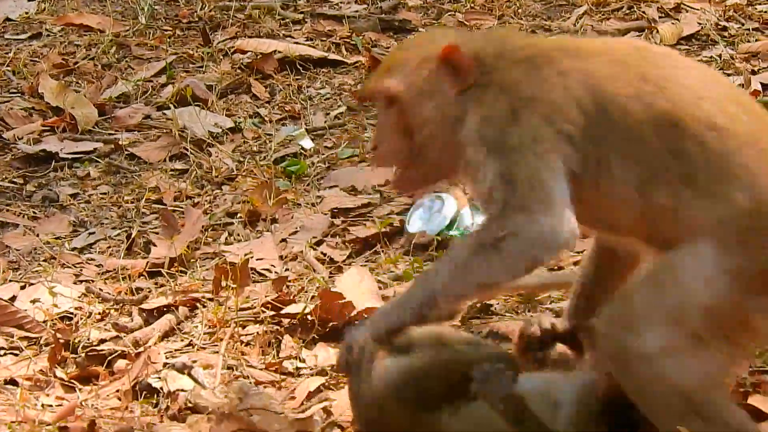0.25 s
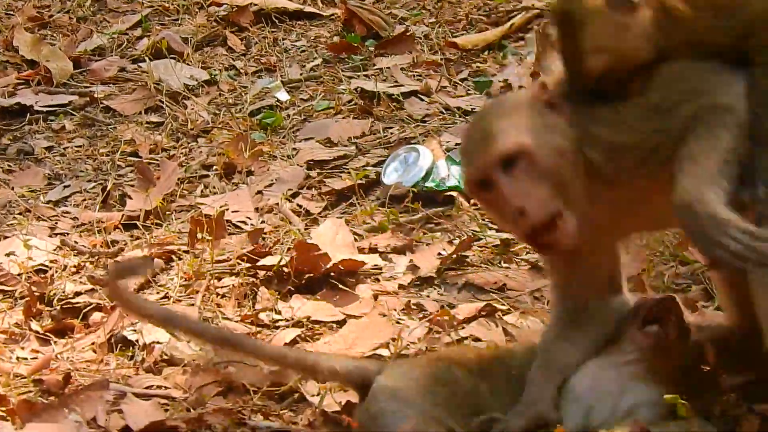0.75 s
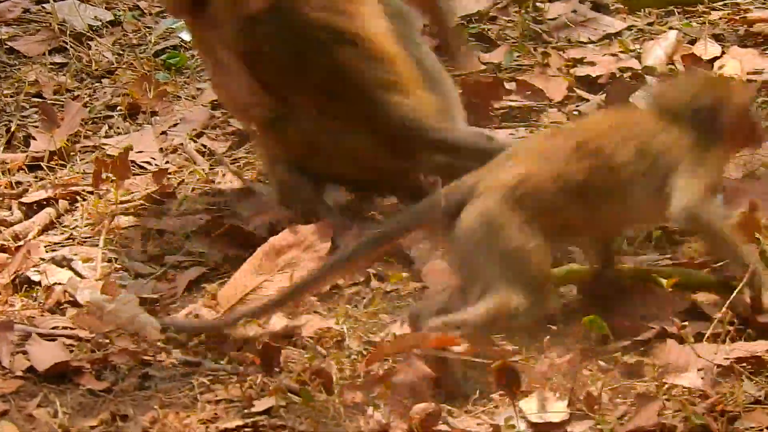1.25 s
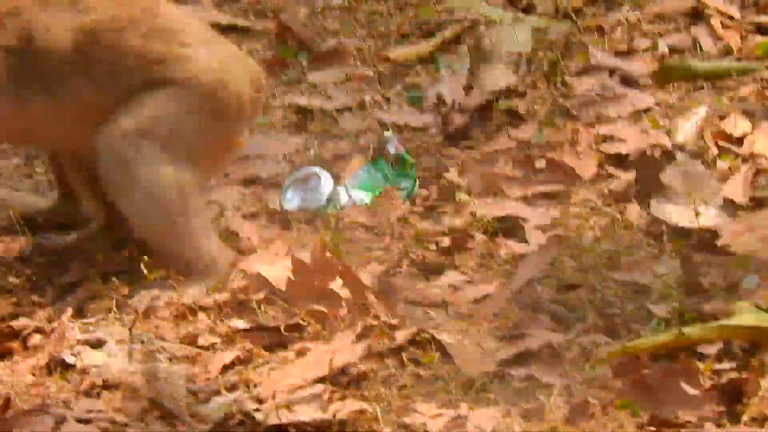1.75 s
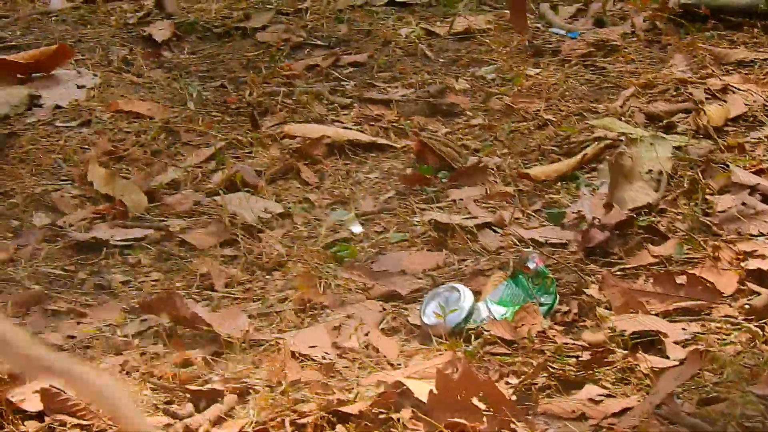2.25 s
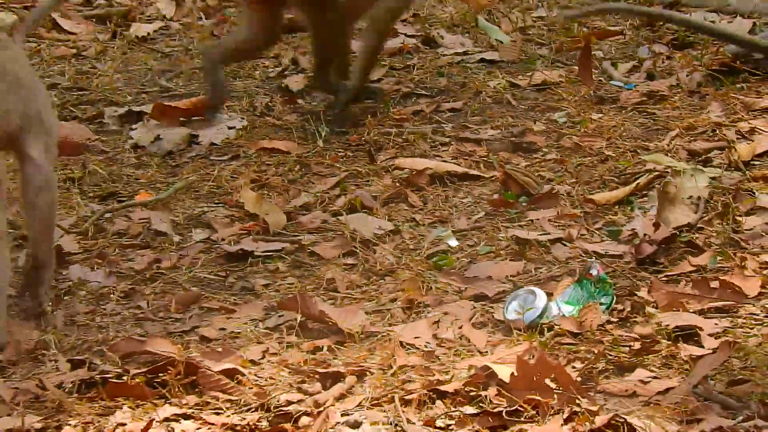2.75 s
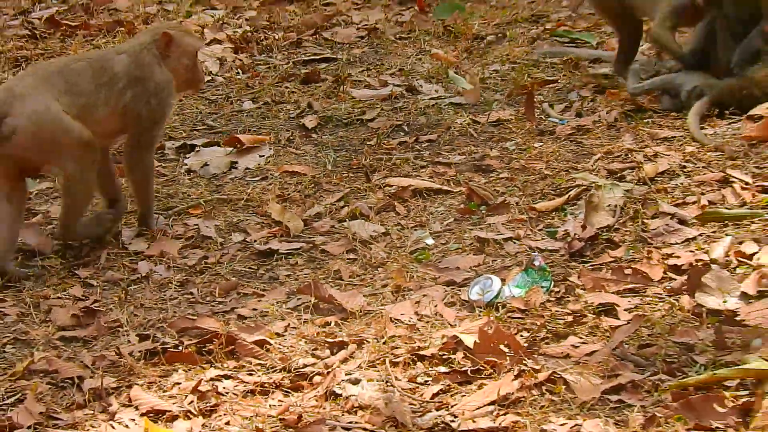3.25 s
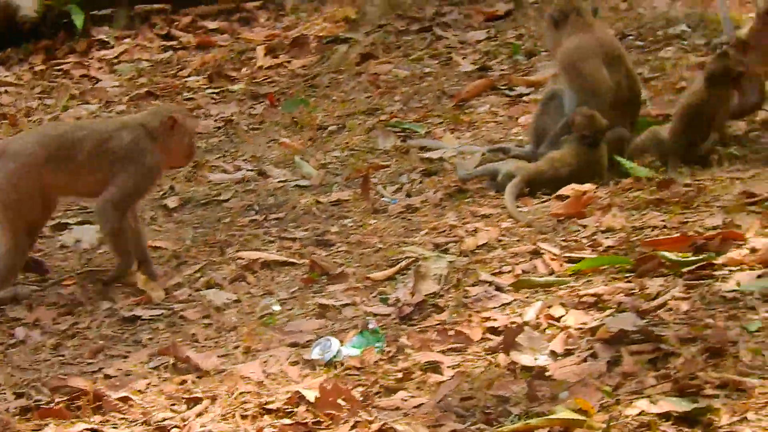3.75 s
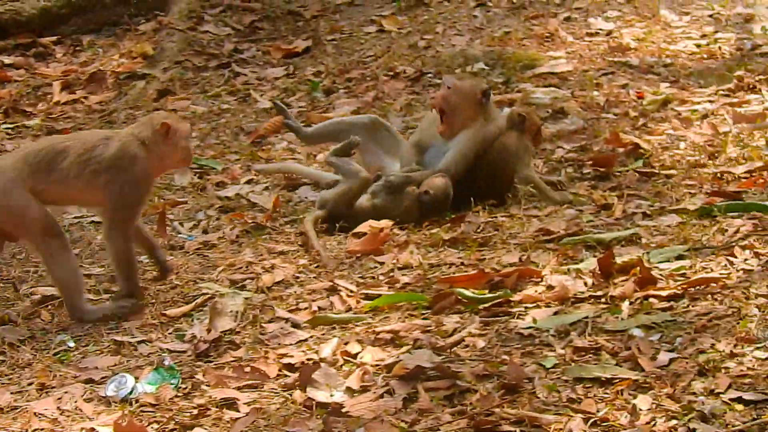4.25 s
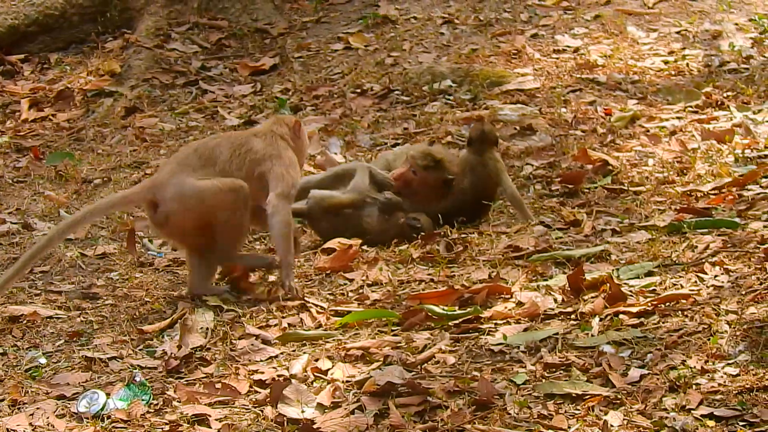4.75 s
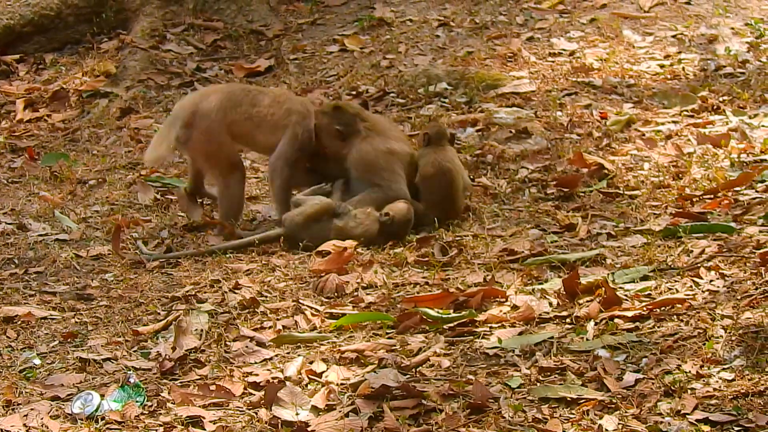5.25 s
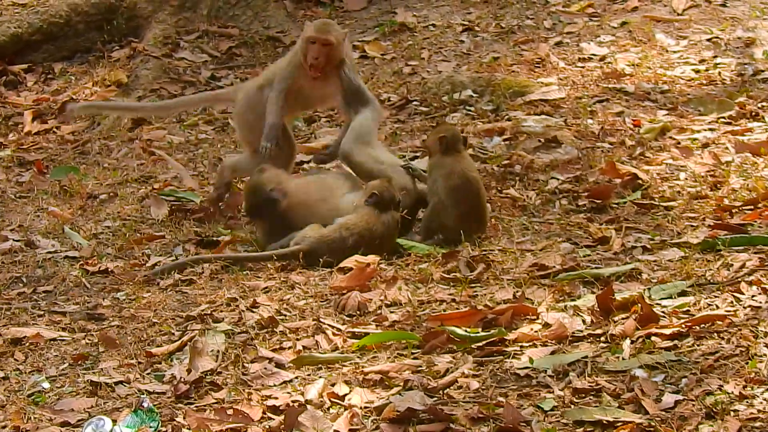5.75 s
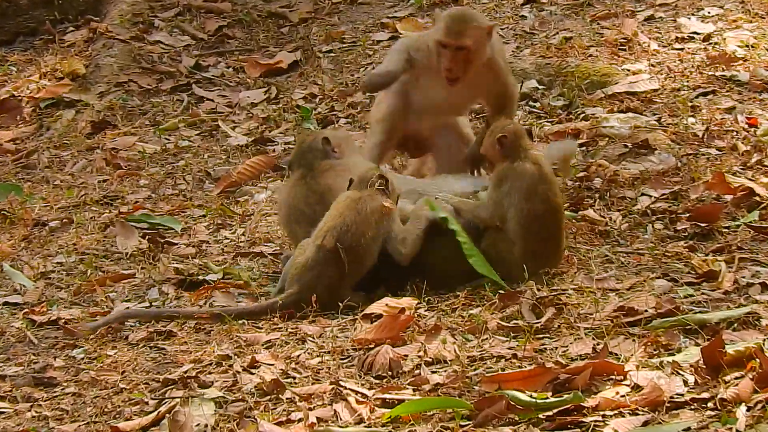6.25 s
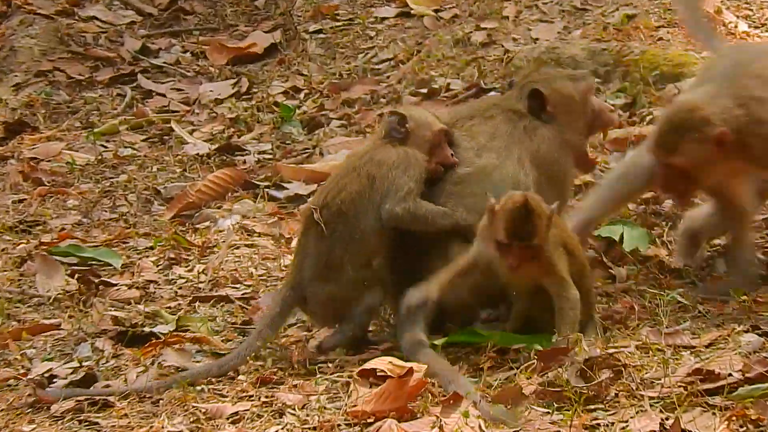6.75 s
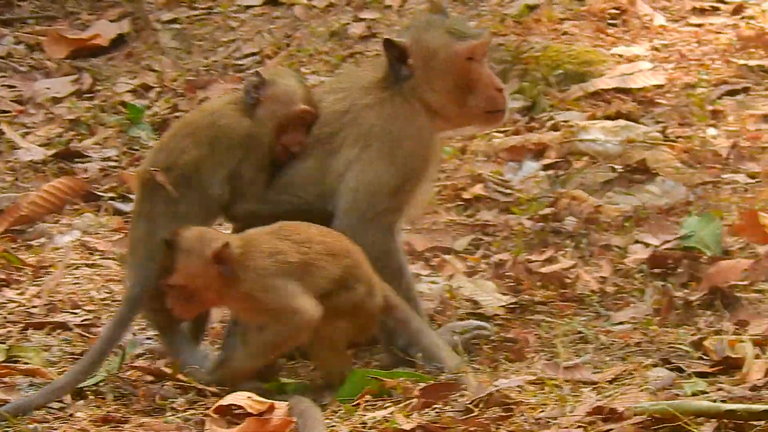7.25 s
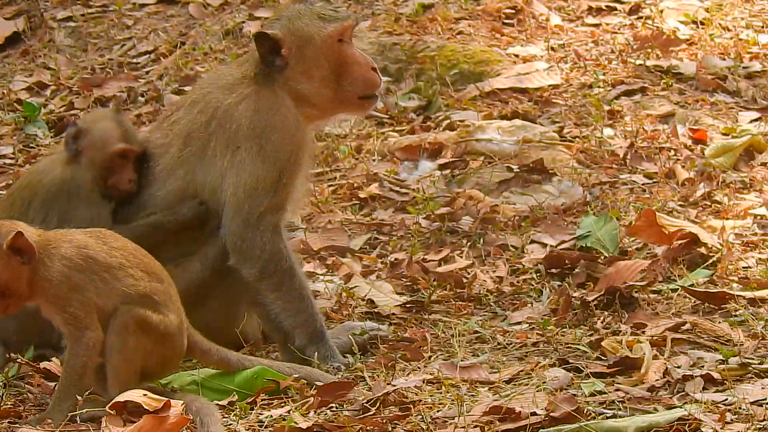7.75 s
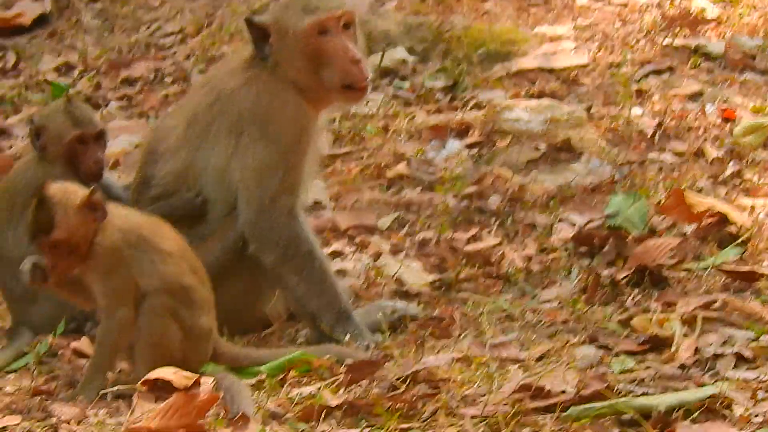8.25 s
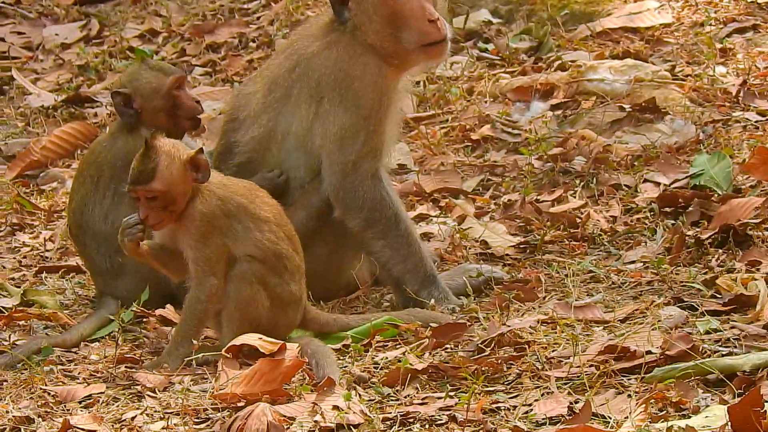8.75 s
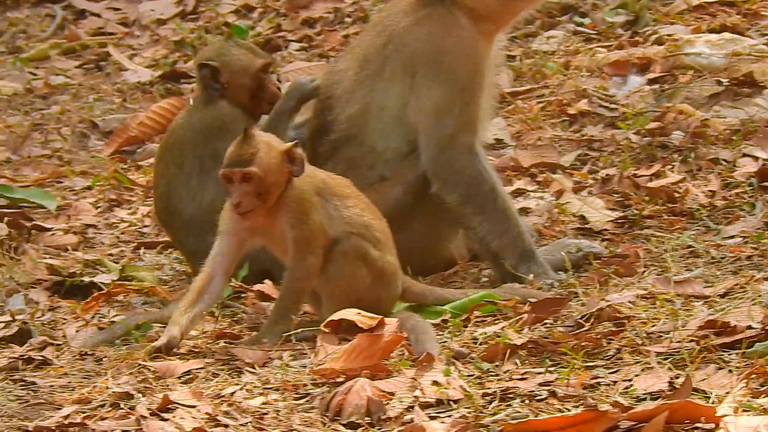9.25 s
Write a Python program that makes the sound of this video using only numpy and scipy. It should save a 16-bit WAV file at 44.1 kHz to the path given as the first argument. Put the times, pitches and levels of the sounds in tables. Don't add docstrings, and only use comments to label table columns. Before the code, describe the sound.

Wall-to-wall cicadas shrill around a camera microphone in dry woodland. Monkeys scuffle at first, thudding and crackling leaves, then only scattered soft knocks. The zoom lever clicks and its little motor whines faintly near the start and again past the middle. Far off, low traffic murmurs and a motorbike revs in short bursts. Halfway through, one close insect starts pulsing rhythmically and speeds up to the end.

```python
import sys
import numpy as np
from scipy import signal
from scipy.fft import rfft, irfft
from scipy.io import wavfile
from scipy.ndimage import uniform_filter1d

SR = 44100
rng = np.random.default_rng(int(sys.argv[2]) if len(sys.argv) > 2 else 0)


def persist_wave(psi):
    counts = np.round(np.clip(psi, -1, 1) * 32767).astype(np.int16)
    wavfile.write(sys.argv[1], SR, np.atleast_2d(counts).T)


def volts_from_decibels(level):
    exponent = np.asarray(level, float) / 20
    return 10 ** exponent


N = 419832
T, HZ = np.arange(N) / SR, np.arange(N // 2 + 1) * SR / N

# frequency_hz, density_db
LOW_DRONE_SPECTRUM = [(680, -44), (1150, -22), (1370, -13), (1600, 2), (1670, 2.5), (1740, 9.5), (1880, 5),
                      (2230, -5.5), (2390, -7), (2600, -5.5), (3380, -40), (5720, -120)]
# frequency_hz, density_db
DRONE_SPECTRUM = [(1290, -47), (2200, -23.5), (2390, -24.5), (2780, -14.5), (3400, 4), (3750, 1),
                  (4080, -7), (4500, -6.5), (5850, -23), (9900, -120)]
# frequency_hz, density_db
HISS_SPECTRUM = [(2350, -26), (4000, -7.5), (4580, -6), (5160, -0.5), (5590, -2), (7090, -0.5),
                 (8400, -12.5), (8690, -18.5), (9360, -24.5), (15500, -50.5)]
# centre_hz, width_hz, level_db
SINGER_OVERTONES = [(3680, 130, 8.5), (5110, 1400, -2), (6670, 1160, 3), (7920, 1080, -2.5),
                    (9530, 630, -21.5), (11320, 830, -25), (12915, 800, -30), (14600, 900, -39)]
# start_s, hiss_level_db, left_minus_right_db
FACING_TURNS = [
    (0.0, -21.3, 1.5),
    (1.0, -22, 1.4),
    (2.8, -23.5, 2.1),
    (4.4, -23, 2),
    (5.5, -22, 2.0),
    (7.5, -21.5, 2.5),
    (9.5, -22, 2.4),
]
DRONE_DB, LOW_DRONE_DB, DRONE_LIFT_DB = -25.5, -37, 2


def cicadas():
    hiss_db, pan_db = columns(FACING_TURNS)
    throb = throbs()
    joined = np.clip((T - 4.5) / 1.2, 0, 1)

    def swarm():
        return clicks(count=150000, scatter_db=1.3)

    low_db = LOW_DRONE_DB + 0.75 * walk(9.)
    out = ports(swarm, shape(LOW_DRONE_SPECTRUM), .1) * volts_from_decibels(low_db)
    drone_db = DRONE_DB + DRONE_LIFT_DB * np.minimum(2 * joined, 1) + 0.32 * walk(11.) - 72 * throb
    out += ports(swarm, shape(DRONE_SPECTRUM), .1) * volts_from_decibels(drone_db)
    hiss = ports(swarm, shape(HISS_SPECTRUM), -.7) * volts_from_decibels(hiss_db - .3 + .4 * walk(8.))
    lull = .34 * joined * (1 - np.minimum(throb / .04, 1))
    upper_hiss = colour(hiss, 1 / (1 + (6800 / (HZ + 1)) ** 8))
    out += hiss - lull * upper_hiss
    power = sum(volts_from_decibels(2 * db) / (1 + (2 * (HZ - f) / w) ** 2) ** 2 for f, w, db in SINGER_OVERTONES)
    out += ports(swarm, np.sqrt(power), -1.1) * (throb + volts_from_decibels(-42) * joined)
    return out, pan_db


# start_s, throbs_per_s
WARMING_RATE = [
    (4.5, 4.2),
    (5.4, 5.711),
    (6.3, 5.76),
    (8.3, 7.254),
    (8.8, 6.862),
    (9.5, 8.099),
]
FIRST_THROB_S, THROB_WIDTH_S = 4.558, .029
THROB_DB, SHY_DB, WARM_S = -25.5, -8, .45


def throbs():
    rate = columns(WARMING_RATE)[0]
    count = np.cumsum(rate) / SR
    count = count - count[int(FIRST_THROB_S * SR)]

    def bell(part):
        return np.exp(-.5 * (part / rate / THROB_WIDTH_S) ** 2)

    swell = bell(count % 1) * (count > 0) + bell(1 - count % 1) * (count > -1)
    shyness = np.exp(-np.maximum(T - FIRST_THROB_S, 0) / WARM_S)
    return swell * volts_from_decibels(THROB_DB + SHY_DB * shyness)


# start_s, peak_db, centre_hz
GROUND_KNOCKS = [(0.248, -37, 686), (0.299, -33, 886), (0.472, -34, 1150), (0.531, -34, 735),
                 (0.636, -26.5, 1100), (0.729, -33, 1010), (0.861, -36, 589), (0.937, -30, 929),
                 (0.973, -37, 487), (1.019, -33, 1240), (1.186, -27, 1170), (1.33, -31.5, 727),
                 (1.412, -22, 1010), (1.42, -20, 1600), (1.553, -24, 1220), (1.599, -33, 624),
                 (2.968, -38, 947), (6.54, -29, 1095), (6.639, -38, 1320), (6.977, -27, 1280),
                 (7.257, -34, 1402), (8.296, -37, 1390), (8.359, -37, 574), (8.537, -33.5, 620),
                 (9.384, -34, 1090)]
# start_s, peak_db
CRUSHED_LEAVES = [
    (0.5122, -43),
    (0.6539, -38),
    (0.7275, -38),
    (0.9887, -43),
    (1.2024, -37),
    (1.453, -37),
    (1.5623, -40),
    (1.712, -36),
]
LEAF_T60_S, RUSTLE_DB = 0.1, -54


def monkeys():
    knocks = thuds([(s, db, c, 0.08, 0.72) for s, db, c in GROUND_KNOCKS])

    def leaf(f):
        return f ** 3 / (f ** 3 + 6000 ** 3) * np.exp(-f / 2200)

    crunch = bursts([(s, db + 15, LEAF_T60_S, leaf) for s, db in CRUSHED_LEAVES], .003)
    grains = clicks(count=60000, scatter_db=1.8)
    snap = level(colour(grains, 1 / (1 + ((HZ - 9300) / 1900) ** 2)), 1.5)
    scrape = level(colour(grains, 1 / (1 + (np.log((HZ + 1) / 800) / .8) ** 4)), .5) * volts_from_decibels(6 * walk(30.))
    dying_away = np.clip((2.6 - T) / 1.8, 0, 1)
    leaves = crunch + (snap + scrape) * volts_from_decibels(RUSTLE_DB + 2.0 * walk(4.4)) * dying_away
    return knocks + np.array([leaves, .5 * (leaves - np.roll(leaves, 5))])


# start_s, peak_db, centre_hz
LEVER_KNOCKS = [
    (2.37, -29.5, 566),
    (2.425, -26, 990),
    (3.658, -32, 719),
    (3.731, -31, 945),
    (3.797, -30, 850),
    (5.704, -41, 685),
    (5.734, -31, 875),
    (5.769, -37, 571),
]
# start_s, peak_db, centre_hz, t60_s, spread
BODY_THUMPS = [
    (2.377, -26.5, 218, 0.16, 0.074),
    (2.429, -33, 224, 0.17, 0.16),
    (5.328, -30, 190, 0.12, 0.2),
]


def handling():
    return thuds([(s, db, c, 0.08, .42) for s, db, c in LEVER_KNOCKS] + BODY_THUMPS)


# start_s, pitch_hz
ZOOM_RUNS = [
    [(2.52, 800), (2.62, 960), (2.8, 945), (2.9, 975), (3.02, 915), (3.07, 960), (3.25, 943), (3.47, 966),
     (3.53, 905)],
    [(5.84, 860), (5.98, 945), (6.1, 915), (6.2, 980), (6.45, 928), (6.75, 961), (6.82, 924), (6.95, 945),
     (7.11, 929)],
]
# first_crest_s, last_crest_s, swing_hz
HUNTING = [
    (2.625, 2.775, 50),
    (3.055, 3.2, 48),
]
ZOOM_DB, ZOOM_HZ, STRAIN_DB_PER_HZ = [-45, -51.5], 946, 0.0738
SPIN_UP_S, STOP_S, PATCHY_DB = .1, .03, 1.2


def zoom_motor():
    out, swing = 0, 0
    for first, last, hz in HUNTING:
        fade = np.clip(np.minimum(T - first, last - T) / 0.0477 + 1, 0, 1)
        swing = swing + hz * np.cos(4 * np.pi * (T - first) / (last - first)) * fade
    for run, db in zip(ZOOM_RUNS, ZOOM_DB):
        hz = columns(run)[0]
        on = np.clip(np.minimum((T - run[0][0]) / SPIN_UP_S, (run[-1][0] - T) / STOP_S), 0, 1)
        slowing = np.minimum(ZOOM_HZ - hz - .5 * swing, 30)
        strain_db = STRAIN_DB_PER_HZ * slowing + PATCHY_DB * walk(14.)
        turns = np.cumsum(hz + swing + 8 * walk(30.)) / SR
        out = out + on * volts_from_decibels(db + strain_db) * np.sin(2 * np.pi * turns)
    return out


# multiple_of_firing_rate, level_db
EXHAUST_HARMONICS = [(1, -38), (2, -26), (3, -8), (4, -5.5), (5, -3), (6, -3), (7, -14), (8, -8), (9, -13),
                     (10, -13.5), (11, -11.5), (12, -12), (13, -32), (14, -43)]


def motorbike():
    hz, gain = throttle()
    turn = np.cumsum(hz * (1 + .005 * walk(20.))) / SR
    thump = 0
    for k, db in EXHAUST_HARMONICS:
        phase = 2 * np.pi * k * turn + 2.5 * np.log(k)
        thump = thump + volts_from_decibels(db + .8 * walk(6.)) * np.cos(phase)
    thump *= volts_from_decibels(.8 * walk(30.))
    echo = rng.standard_normal(8192) * volts_from_decibels(-42.5 - 130 * T[:8192])
    echo[0] = 1
    pipe = 1.4 / np.sqrt(1 + (2 * (HZ - 150) / 95) ** 2)
    return colour(level(thump, -0.57) * gain, pipe * rfft(echo, N))


# throttle_opens_s, revs_up_s, throttle_shuts_s, top_firing_rate_hz, level_db
THROTTLE_BLIPS = [
    (3.14, 3.428, 3.5, 23.4, -32),
    (4.849, 5.181, 5.5, 18, -38.5),
    (5.72, 6.53, 7.08, 27.4, -33.5),
    (7.651, 8.17, 8.25, 29.2, -33),
]
IDLE_HZ, CREEP_HZ_PER_S, RUN_DOWN_S = 13.5, 2.6, .22
OFF_LOAD_DB, HEARD_AFTER_S, FADE_S = -6, 0.49, 0.15


def throttle():
    t = T[::64]
    hz, gain = np.full(len(t), 1. * IDLE_HZ), np.zeros(len(t))
    for opens, up, shuts, top_hz, db in THROTTLE_BLIPS:
        u = np.clip((t - opens) / (up - opens), 0, 1)
        effort = u ** 2 * (3 - 2 * u) * np.exp(-np.maximum(t - shuts, 0) / RUN_DOWN_S)
        hz += effort * (top_hz - IDLE_HZ + CREEP_HZ_PER_S * np.clip(t - up, 0, shuts - up))
        heard = np.clip(np.minimum(t - opens, shuts + HEARD_AFTER_S - t) / FADE_S, 0, 1)
        gain += heard * volts_from_decibels(db + OFF_LOAD_DB * (1 - effort))
    return np.interp(T, t, hz), np.interp(T, t, gain)


# frequency_hz, density_db
TYRE_SPECTRUM = [(180, -30), (300, -2.5), (339, -6.5), (404, -3), (445, -8), (490, -7), (957, -5),
                 (1020, -6), (1400, -8), (1820, -6), (3080, -120)]
# frequency_hz, density_db
RUMBLE_SPECTRUM = [(13, -50), (22, -20), (29, -34), (37, -4), (86, 7), (133, 5), (156, 2.5), (210, -4),
                   (232, -9.5), (282, -13), (330, -14), (430, -48), (730, -120)]
# frequency_hz, density_db
GROWL_SPECTRUM = [(120, -37), (200, 4.5), (232, 1), (285, -1), (361, -11), (404, -7.5), (560, -24),
                  (730, -34), (1230, -120)]
# start_s, level_db
TRAFFIC_FLOW = [
    (0.0, 0),
    (2.5, 0.5),
    (4.1, -3),
    (5.1, -4),
    (6.0, -1.5),
    (6.9, -1.5),
    (7.6, -4),
    (9.5, -7.5),
]
# start_s, level_db
ENGINE_LOAD = [(0.0, 1.5), (0.8, -0.5), (1.14, -9), (1.45, -2.5), (2.35, 3), (2.55, -11.5), (3.7, -9),
               (4.3, -3.5), (4.8, -6), (5.6, 2), (6.1, -9), (8.4, -14), (8.9, -8), (9.5, -12)]
# frequency_hz, level_db
LOADED_TONES = [(159.7, -40.5), (203.5, -49), (281, -50.5), (400, -58)]
# frequency_hz, level_db
LOWEST_TONES = [(48.4, -46.5), (81, -54.5), (121, -49.5)]
TYRES_DB, RUMBLE_DB, GROWL_DB = -47.5, -41, -46
SHAKE_DB = 5.5
GROWL_LEAVES_DB, GROWL_LEAVES_S = -10, 1.0


def town():
    traffic_db, load_db = columns(TRAFFIC_FLOW)[0], columns(ENGINE_LOAD)[0]
    revs = throttle()[0] / IDLE_HZ - 1

    def noise():
        return rng.standard_normal(N)

    out = ports(noise, shape(TYRE_SPECTRUM), .1) * volts_from_decibels(TYRES_DB + traffic_db + 0.69 * walk(5.5))
    out += ports(noise, shape(RUMBLE_SPECTRUM), .1) * volts_from_decibels(RUMBLE_DB + 1.3 * walk(4.4))
    leaving_db = GROWL_LEAVES_DB * (1 - np.exp(-T / GROWL_LEAVES_S))
    growl_db = GROWL_DB + leaving_db + SHAKE_DB * revs + 3.7 * walk(5.)
    out += ports(noise, shape(GROWL_SPECTRUM), .1) * volts_from_decibels(growl_db)
    drift = np.cumsum(1 + 0.00598 * walk(3.5)) / SR
    loaded = [(f, db + load_db + 2.4 * walk(2.5)) for f, db in LOADED_TONES]
    for f, db in LOWEST_TONES + loaded:
        out[0] += volts_from_decibels(db + 1.3 * walk(4.)) * np.sin(2 * np.pi * f * drift)
    return out


# frequency_hz, side_minus_mid_db
STEREO_WIDTH = [(60, -19), (110, -21), (200, -15), (380, -10), (700, -12), (1290, -11), (2380, -13),
                (4400, -9), (8120, 0.5), (15000, 2)]
# frequency_hz, share
STEREO_LEAN = [(6000, 0.089), (7200, 0.87), (8500, 0.43), (10000, .3), (11000, -.3), (13000, -.3)]


def ports(source, gain, wide_db):
    mid, other = rfft(source()) * gain, rfft(source()) * gain
    lean = np.clip(over_hz(STEREO_LEAN), -1, 1)
    side = np.sqrt(1 - lean ** 2) * other - 1j * lean * mid
    side = side * volts_from_decibels(over_hz(STEREO_WIDTH) + wide_db)
    pair = irfft(np.array([mid, side]), N)
    return pair / np.sqrt(np.mean(pair[0] ** 2))


def thuds(rows):
    def body(centre, spread):
        return lambda f: 1 / (1 + (np.log((f + 1) / centre) / spread) ** 2) ** 1.3

    knocks = bursts([(s, db - 3.0, t60, body(c, w)) for s, db, c, t60, w in rows], 0.0022)
    return np.array([knocks, 0.075 * knocks])


def bursts(table, rise_s):
    out, t, hz = np.zeros(N + 8192), np.arange(8192) / SR, np.arange(4097) * SR / 8192
    for s, db, t60, gain in table:
        burst = irfft(rfft(rng.standard_normal(8192)) * gain(hz))
        envelope = volts_from_decibels(-60 * t / max(t60, .01)) * (1 - np.exp(-t / rise_s))
        i = int(s * SR)
        out[i:i + 8192] += level(burst, db) * envelope
    return out[:N]


def clicks(count, scatter_db):
    when, sign, size = rng.random((3, count))
    strength = np.sign(sign - .5) * volts_from_decibels(-scatter_db * np.log(size))
    return np.bincount((when * N).astype(int), strength, N)


def walk(rate):
    k = int(SR / 64 / rate)
    held = np.repeat(rng.standard_normal(N // (64 * k) + 1), k)
    smooth = uniform_filter1d(uniform_filter1d(held, k), k)
    return 1.3 * np.interp(T, np.arange(len(held)) * 64 / SR, smooth)


def level(x, db):
    return x * volts_from_decibels(db) / np.sqrt(np.mean(x ** 2))


def columns(table):
    s, *cols = np.transpose(table)
    return [np.interp(T, s, c) for c in cols]


def over_hz(points, **ends):
    hz, value = np.transpose(points)
    return np.interp(np.log(HZ + 1), np.log(hz), value, **ends)


def shape(points):
    return volts_from_decibels(over_hz(points, left=-150, right=-150))


def colour(x, gain):
    return irfft(rfft(x) * gain, N)


def scene():
    choir, pan_db = cicadas()
    mid, side = choir + town() + monkeys() + handling()
    mid = mid + motorbike() + zoom_motor()
    below = np.clip((4030 - HZ) / 50, 0, 1)
    above = np.minimum(1.2 * np.exp((HZ - 4000) / 330), 1)
    lag = np.exp(-2j * np.pi * HZ * 41.5 / 3953)
    mid = colour(mid, (below + above / lag) / np.hypot(below, above))
    tilt = volts_from_decibels(np.array([pan_db, -pan_db]) / 2)
    pair = np.array([mid + side, mid - side])
    bass = colour(pair, 1 / (1 + (HZ / 300) ** 2))
    return bass + (pair - bass) * tilt


def top_cut(x):
    return signal.sosfilt(signal.butter(12, 15640, fs=SR, output="sos"), x)


def record(dry):
    mix = colour(dry, 1 / np.sqrt(1 + (36 / (HZ + 1)) ** 6))
    return top_cut(mix)


dry = scene()
out = record(dry)
persist_wave(out)
```